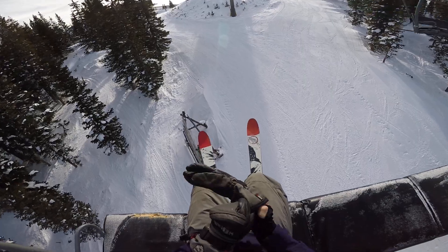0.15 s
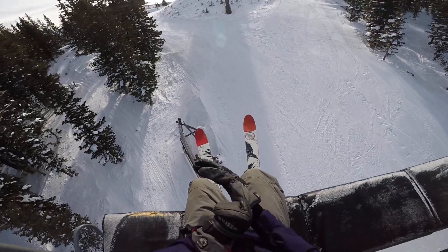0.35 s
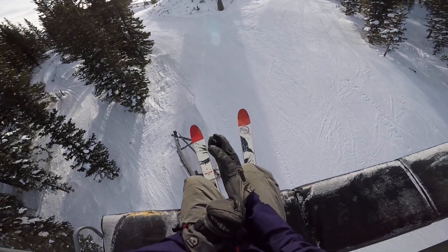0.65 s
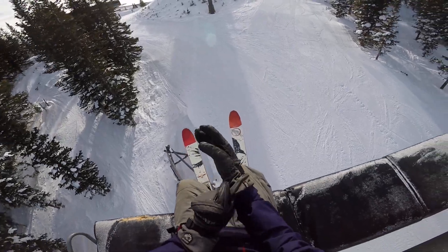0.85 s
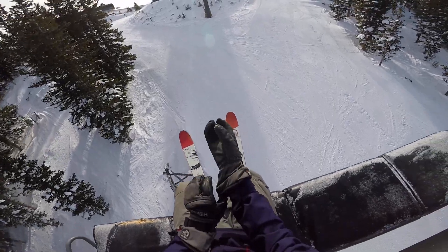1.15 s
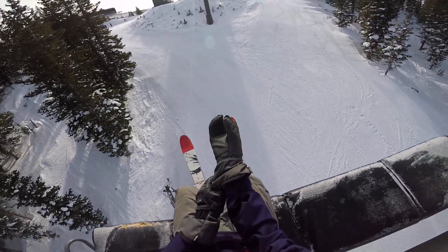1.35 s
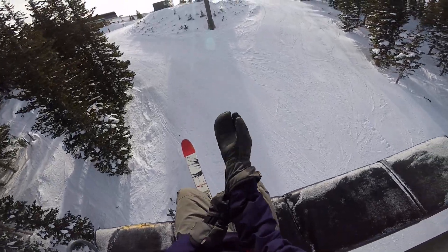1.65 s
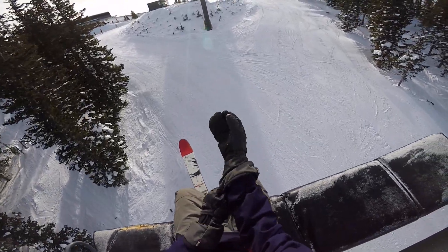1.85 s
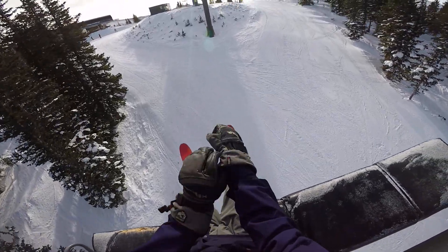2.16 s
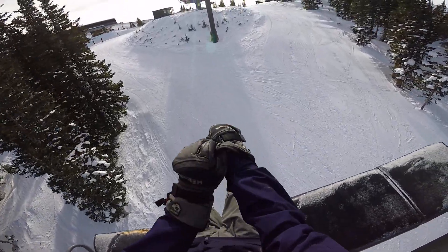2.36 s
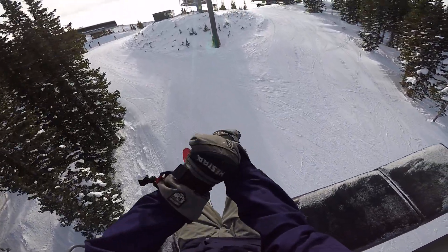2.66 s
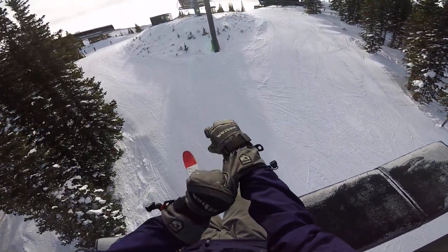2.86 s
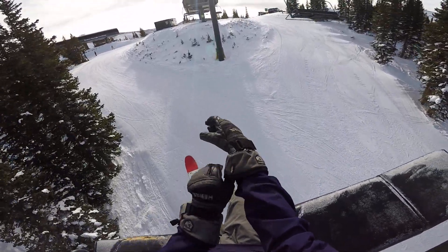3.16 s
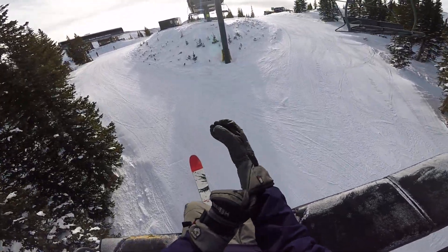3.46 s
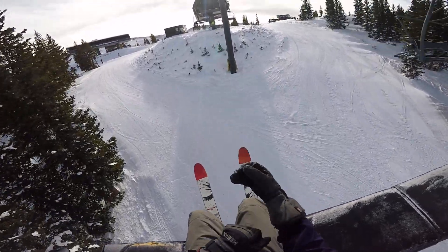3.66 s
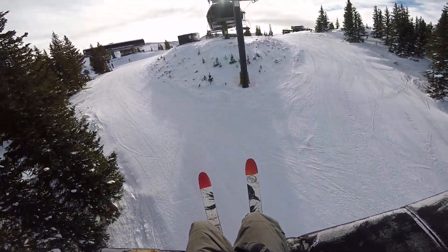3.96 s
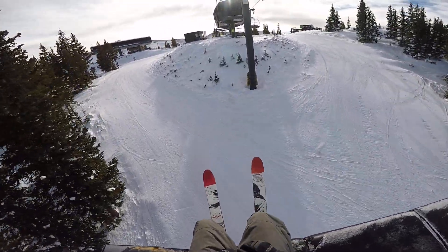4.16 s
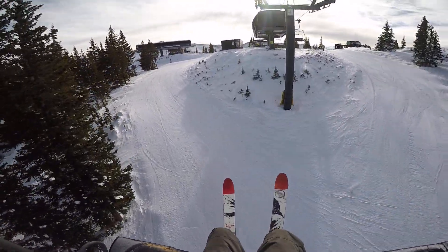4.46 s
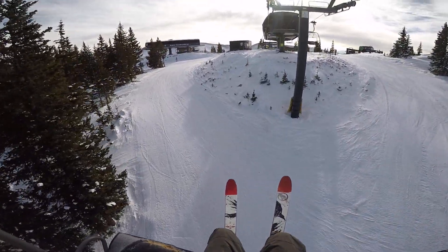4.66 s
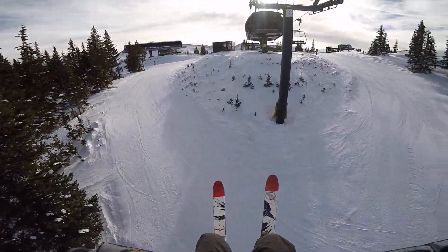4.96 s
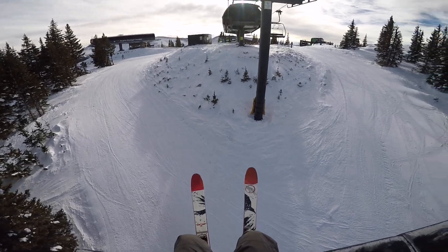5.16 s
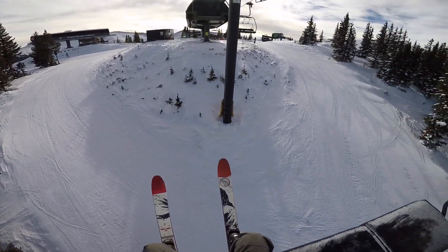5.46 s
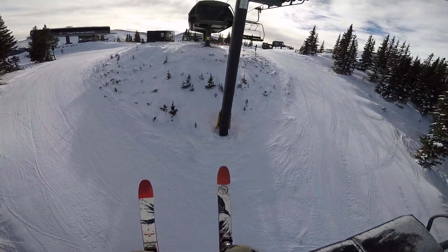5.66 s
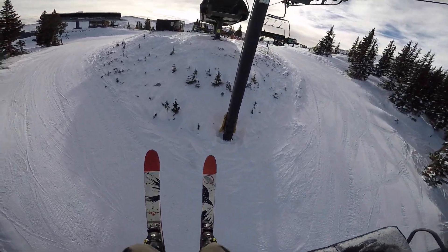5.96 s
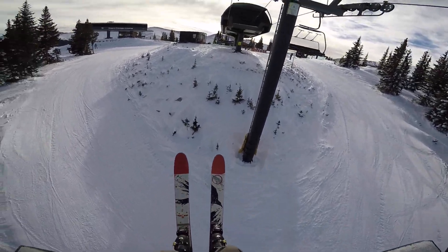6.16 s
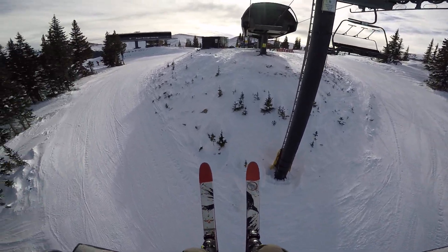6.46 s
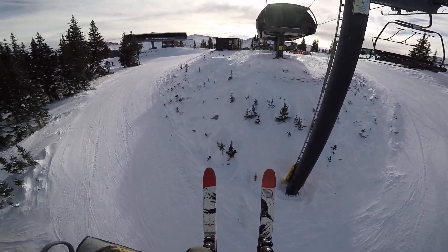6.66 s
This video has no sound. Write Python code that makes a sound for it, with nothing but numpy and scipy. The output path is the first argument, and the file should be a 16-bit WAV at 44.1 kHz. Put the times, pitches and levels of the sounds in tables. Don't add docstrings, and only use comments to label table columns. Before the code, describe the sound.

Riding a ski lift: steady cable rumble and hiss grow louder, with metallic chatter, dull knocks and gusty wind thumping the microphone.

```python
import sys
import numpy as np
from scipy import signal
from scipy.io import wavfile
from scipy.ndimage import uniform_filter1d

SR = 44100
rng = np.random.default_rng(int(sys.argv[2]) if len(sys.argv) > 2 else 0)


def file_out(sig):
    cols = np.atleast_2d(sig).T
    lim = np.clip(cols, -1, 1)
    pcm = np.round(lim * 32767).astype(np.int16)
    wavfile.write(sys.argv[1], SR, pcm)


def ratio(d):
    e = np.asarray(d, float) / 20
    return 10 ** e


N = 300762
T = np.arange(N) / SR
STRAND_HZ = 80
RUMBLE_DB, RUMBLE_SHARE = -26.5, 0.4


def evened(x):
    return x / np.sqrt(np.mean(x ** 2) + 1e-20)


def read(points, hz):
    f, value = np.transpose(points)
    return np.interp(np.log(hz + 1), np.log(f + 1), value)[:, None]


def curve(rows, col, t=T):
    rows = np.array(rows)
    return np.interp(t, rows[:, 0], rows[:, col])


def slow(rate_hz):
    return evened(signal.lfilter(*signal.butter(2, rate_hz, fs=SR), rng.standard_normal(N)))


def ringing(modes):
    out = rng.standard_normal((2, N))
    for hz, width, db in modes:
        r = np.exp(-np.pi * width / SR)
        pole = r * np.exp(2j * np.pi * hz / SR)
        ring = signal.lfilter([1 - r], [1, -pole], rng.standard_normal((2, N)))
        out = out + ratio(db + 18.5) * 2 * ring.real
    return out


# [t/s, share of the pair 0-1]
OPEN_SHARE = [(0, 0), (2.37, 0), (2.5, .3), (2.8, .55), (3.3, 1), (6.82, 1)]
# [f/Hz, likeness 0-1]
LIKENESS_ONE = [(11400, 1), (11900, 0.51), (13500, 0.33), (15000, 0.74)]
# [f/Hz, likeness 0-1]
LIKENESS_PAIR = [(60, 0.6), (160, 0.75), (270, 0.86), (440, 0.91), (730, 0.78), (1050, 0.56), (1500, 0.14),
                 (2100, 0.61), (3000, 0.61), (4300, 0.83), (5200, 0.51), (7300, 0.79), (8400, 0.062),
                 (10000, 0.083), (13000, .03)]
# [f/Hz, level/dB]
LEFT_LOUDER = [(60, -0.5), (270, 1.5), (440, 3), (730, 2.5), (1050, 5.5), (1500, 2.5), (2100, 0),
               (4300, 5.5), (5200, 4), (6300, 5.5), (7300, 2.5), (8400, -7), (13000, -2.5)]
# [f/Hz, phase/rad]
LEFT_AHEAD = [(60, 0), (1050, .38), (1500, -.9), (2800, -.24), (4300, .08), (6300, .65), (8400, 1.3),
              (13000, 1.3)]


def ports(pair, one, two, band, size, tilt=None, lean=None, same=None):
    overlap = size * 3 // 4
    hz, t, (a, b) = signal.stft(pair, SR, nperseg=size, noverlap=overlap)
    share = np.clip(curve(OPEN_SHARE, 1, t), 0, 1)
    power = (1 - share) * ratio(2 * read(one, hz)) + share * ratio(2 * read(two, hz))
    colour_db = 10 * np.log10(power)
    if tilt is not None:
        octaves = np.log2(np.maximum(hz[:, None] / band[1], 1))
        colour_db = colour_db + np.interp(t, T, tilt) * octaves
    inside = (hz > band[0]) & (hz < band[1])
    colour = ratio(colour_db) / np.sqrt(np.sum(ratio(2 * colour_db[inside]), 0) / len(hz))
    pair_like = read(LIKENESS_PAIR, hz) if same is None else same
    like = np.clip((1 - share) * read(LIKENESS_ONE, hz) + share * pair_like, -1, 1)
    lean_db = share * read(LEFT_LOUDER, hz) if lean is None else np.interp(t, T, lean)
    left = ratio(lean_db / 2)
    shared = like * np.exp(-1j * share * read(LEFT_AHEAD, hz)) / left
    own = np.sqrt(1 - like ** 2) / left
    middle = np.sqrt(abs(left + shared) ** 2 + own ** 2) / 2
    z = np.array([left * a, shared * a + own * b]) * colour / middle
    return signal.istft(z, SR, nperseg=size, noverlap=overlap)[1][:, :N]


# [t/s, level/dB]
GUST_LEVEL = [(0, -45), (0.12, -41), (0.6, -36), (1.7, -34.5), (2.1, -29), (2.45, -35), (3.12, -23.5),
              (3.48, -29), (4.02, -20.5), (4.2, -26.5), (4.38, -20.5), (4.56, -31.5), (4.92, -25),
              (5.25, -22.5), (5.64, -24), (5.82, -21), (6.0, -27.5), (6.4, -23.5), (6.82, -25.5)]
# [f/Hz, level/dB per Hz]
WIND_COLOUR = [(7.1, -21), (12, 7), (81, -3.5), (150, -20.5), (178, -13), (226, -16.5), (366, -19.5),
               (400, -17), (520, -23.5), (880, -120)]
# [t/s, level/dB]
WIND_LEAN = [(0, 0), (2.3, 0), (2.7, -6), (3.3, -12), (4.4, -12), (4.55, -3), (5.4, -4), (6.4, -5),
             (6.82, -2)]


def wind():
    gust_db = curve(GUST_LEVEL, 1)
    lumps = rng.standard_normal((2, N)) * ratio(gust_db + 0.94 * slow(9.8))
    tilt = -2 - 0.34 * (gust_db + 31)
    return ports(lumps, WIND_COLOUR, WIND_COLOUR, (15, 60), size=4096, tilt=tilt,
                 lean=curve(WIND_LEAN, 1), same=0.64)


# [t/s, nearness of the tower level/dB, load on the wheels level/dB]
RIDE_COURSE = [(0, -14, -12), (0.14, -22, -10), (0.25, -14.5, -8), (0.36, -13.5, -7), (0.6, -10.5, -7),
               (0.76, -14.5, -11), (0.88, -11, -7), (0.96, -11, 0.5), (1.2, -8, -1.5), (1.6, -8.5, 2.5),
               (2.55, -9, 1), (2.85, -10, -3), (3.35, -6, -1), (3.75, -4, -4.5), (4.4, -4, 1),
               (4.75, -3, -0.5), (5.2, -1, 0), (6.55, 1.5, -4), (6.82, 2.5, -0.5)]
# [f/Hz, level/dB per Hz]
RUMBLE_COLOUR = [(29, -23.5), (50, 1), (70, -2), (105, -2.5), (147, -5.5), (189, -6.5), (232, -9),
                 (291, -10.5), (366, -12.5), (401, -14), (770, -20.5), (1000, -74), (1690, -120)]
# [f/Hz, width/Hz, level/dB]
FRAME_MODES = [(84, 10, -21), (95.3, 2.9, -20.5), (143, 4, -11), (155.9, 4, -12), (182.6, 1.3, -18),
               (230.2, 6, -11), (592, 103, -19.5), (732, 3.7, -13.5)]
# [f/Hz, level/dB per Hz]
WHIRR_COLOUR = [(460, -26), (780, -3), (903, -2), (1010, -3), (1230, -12.5), (1700, -17), (2210, -46),
                (3740, -120)]
# [f/Hz, width/Hz, level/dB]
WHEEL_MODES = [(964, 38, -13), (1018, 43, -11), (1142.4, 17, -7.5), (1405, 21, -14.5), (1243, 8, -10.5),
               (1618, 13, -11)]
# [f/Hz, level/dB per Hz]
HISS_COLOUR_ONE = [(710, -24), (1200, -0.5), (1650, -4), (1770, -3), (1890, -5), (2060, -7), (2170, -5.5),
                   (3110, -12.5), (4090, -8.5), (5100, -12.5), (6300, -14), (7200, -21), (8200, -17),
                   (8930, -14), (12800, -28), (15000, -33)]
# [f/Hz, level/dB per Hz]
HISS_COLOUR_PAIR = [(710, -19), (1200, -1), (1500, -1.5), (2360, -3), (2800, -3.5), (3110, -5.5),
                    (3600, -3.5), (4790, -9.5), (5610, -6.5), (7310, -7), (8300, -11.5), (9000, -15.5),
                    (9600, -13), (10300, -16.5), (12700, -24), (14200, -29), (15000, -80)]
# [f/Hz, width/Hz, level/dB]
TOWER_MODES = [(1913, 61, -14.5), (2175, 48, -15), (2808, 59, -15), (6260, 50, -16), (6450, 34, -14),
               (7250, 79, -13)]


def rope():
    flicker = slow(8.5)
    near_db, load_db = curve(RIDE_COURSE, 1), curve(RIDE_COURSE, 2)
    rumble_db = RUMBLE_DB + RUMBLE_SHARE * near_db - 4.5 + 1.0 * flicker
    rumble = ringing(FRAME_MODES) * ratio(rumble_db)
    whirr_db = -40.5 + 0.47 * near_db + load_db - 5.0 + 0.82 * flicker
    whirr = ringing(WHEEL_MODES) * ratio(whirr_db)
    throb_db = 1.2 * np.cos(2 * np.pi * STRAND_HZ * T)
    hiss_db = -40.5 + near_db - 3.0 + 0.84 * flicker + throb_db + 0.75 * slow(60)
    hiss = ringing(TOWER_MODES) * ratio(hiss_db)
    return (ports(rumble, RUMBLE_COLOUR, RUMBLE_COLOUR, (90, 700), size=2048)
            + ports(whirr, WHIRR_COLOUR, WHIRR_COLOUR, (800, 1400), size=1024)
            + ports(hiss, HISS_COLOUR_ONE, HISS_COLOUR_PAIR, (1600, 11000), size=512))


# [t/s, level/dB]
STRAND_LEVEL = [(0, -61), (0.9, -45), (2.0, -35), (2.2, -51), (2.4, -29.5), (3.0, -34), (3.4, -29),
                (3.6, -33.5), (3.9, -28), (4.2, -34), (4.6, -26.5), (5.0, -22.5), (5.2, -39), (5.4, -28),
                (5.75, -26.5), (6.0, -17), (6.3, -30), (6.82, -27.5)]
DRIVE_PITCHES = [142.7, 156, 226.8, 232.4, 259, 363.7, 433.1, 516]
# [level/dB against the rumble, single-port change/dB, change under the tower/dB and /Hz]
DRIVE_LEVELS = [(-16, 2.5, -2, 0), (-14.5, -5, 2.5, 0), (-15, 1.5, -4.5, 0), (-18.5, 1.5, 1, 0),
                (-23, 2, -1, 0), (-16, -4, 1, 0), (-21, 0, -2, 0), (-24, 1.5, 3.5, 3)]


def tones():
    share = curve(OPEN_SHARE, 1)
    apart = np.array([[1], [-1]]) * share
    turns = np.cumsum(STRAND_HZ + 1.3 * slow(3.4)) / SR
    strand_amp = ratio(curve(STRAND_LEVEL, 1) + 1.5 + 0.85 * slow(5.8))
    out = strand_amp * np.sin(2 * np.pi * turns + 0.15 * apart * slow(3.5))
    rumble_db = uniform_filter1d(RUMBLE_DB + RUMBLE_SHARE * curve(RIDE_COURSE, 1), SR // 2)
    under = np.clip((T - 3.6) / (5.2 - 3.6), 0, 1)
    for hz, (db, one_db, under_db, shift_hz) in zip(DRIVE_PITCHES, DRIVE_LEVELS):
        turns = np.cumsum(hz + shift_hz * under + 0.3 * slow(1.5)) / SR
        waver_db = 1.2 * slow(3.5)
        tone_db = rumble_db + db + 5.5 + one_db * (1 - share) + under_db * under + waver_db
        out = out + ratio(tone_db) * np.sin(2 * np.pi * turns + 0.16 * apart * slow(3.3))
    return out


# [t/s, peak level/dB, time to fade by 60 dB/s]
KNOCK_EVENTS = [(0.164, -39, .05), (0.62, -33, 0.15), (0.67, -33, .05), (0.984, -37, .06),
                (1.037, -32, 0.058), (1.269, -36, 0.06), (1.832, -37, 0.16), (2.473, -28.5, 0.13),
                (3.286, -26, 0.12), (3.706, -27, 0.13), (3.829, -32.5, 0.72), (4.579, -27.5, 0.33),
                (4.72, -25, 0.062), (4.989, -29.5, 0.32), (5.074, -23, 0.063), (5.186, -28, 0.47),
                (5.39, -25.5, 0.3), (5.799, -28, 0.21), (5.959, -25, 0.12), (6.339, -26, 0.45),
                (6.45, -25.5, 0.37), (6.497, -18.5, 0.068), (6.54, -23.5, 0.13), (6.574, -22.5, 0.28),
                (6.754, -24, 0.14)]
# [f/Hz, level/dB per Hz]
KNOCK_COLOUR = [(400, -36), (800, 13), (1050, 8.5), (1500, -1), (2200, -0.5), (2900, -4.5), (4200, -1.5),
                (6500, -19.5)]


def knocks():
    power = np.zeros(N)
    for s, db, t60 in KNOCK_EVENTS:
        start = round(s * SR)
        after = T[:min(SR // 2, N - start)]
        fade = ratio(2 * db - 120 * after / max(t60, .03))
        power[start:start + len(after)] += fade * (1 - np.exp(-after / 0.01))
    dull = ratio(-11.5) * np.sqrt(power) * ringing(WHEEL_MODES + TOWER_MODES)
    return ports(dull, KNOCK_COLOUR, KNOCK_COLOUR, (800, 3000), size=512)


# [t/s, spread/s, f/Hz, peak level/dB]
GROAN_EVENTS = [(2.165, 0.053, 410, -34.5), (7.8, 0.026, 1025, -34.5), (6.375, 0.024, 935, -35),
                (6.43, .06, 1030, -36), (6.78, 0.074, 480, -33.5), (6.2, 0.043, 1030, -39),
                (5, 0.096, 156, -30), (4.95, 0.059, 105, -29.5), (5.08, 0.072, 143, -26.5),
                (5.51, 0.083, 120, -24), (6.9, 0.083, 154, -26), (6.62, .07, 82, -26.5),
                (6.63, 0.078, 200, -33), (6.62, 0.09, 235, -33), (5.0, 0.042, 170, -32.5),
                (2.95, .1, 146, -33), (1.0, 0.052, 86, -28.5), (0.59, 0.075, 180, -33),
                (2.2, 0.031, 310, -39), (4.2, .04, 330, -36)]


def groans():
    shake = 0.93 * slow(28)
    out = np.zeros(N)
    for s, spread, hz, db in GROAN_EVENTS:
        swell = np.exp(-((T - s) / spread) ** 2 / 2)
        phase = 2 * np.pi * hz * T + min(hz / 900, 1) * shake
        out = out + ratio(db) * swell * np.sin(phase)
    return out


def train(events):
    s, db = np.transpose(events)
    return np.bincount(np.round(s * SR).astype(int), ratio(2 * db), N)[:N]


# [t/s, length/s, peak level/dB, every second
# strand level/dB]
CHATTER_BURSTS = [(0.605, 0.045, -50, 0), (1.002, 0.047, -57, -13), (1.182, 0.02, -40.5, -2),
                  (1.266, 0.13, -43.5, 2), (1.464, 0.06, -54, -10), (1.578, 0.12, -41, -2),
                  (1.817, 0.082, -44, -8), (2.071, 0.21, -43, -2), (2.27, 0.15, -45, -7),
                  (2.449, 0.17, -42, -14), (2.656, 0.056, -36, -3), (2.771, 0.1, -43.5, 4.5),
                  (2.89, 0.041, -36.5, -0.5), (2.972, 0.022, -39.5, -8), (3.072, 0.022, -38, 2),
                  (3.247, 0.13, -41.5, 3), (3.415, 0.033, -34, -3), (3.59, 0.043, -35, 1.5),
                  (3.708, 0.0066, -32.5, 0), (3.823, 0.033, -34, 0.5), (3.984, 0.094, -39, 7),
                  (4.211, 0.016, -37, -1), (4.28, 0.016, -29.5, -18), (4.322, 0.028, -40.5, 9.5),
                  (4.390, 0.085, -35.5, -22),
                  (4.491, .013, -30.5, 1.5), (4.563, 0.068, -31.5, -4), (4.695, 0.027, -34, 8),
                (4.83, 0.05, -30.5, -2), (4.922, 0, -29.5, 13), (4.986, 0.0099, -28.5, 0),
                (5.073, 0.046, -30, -3), (5.159, 0.099, -30, 1), (5.264, 0.0053, -27, 2),
                (5.307, 0.023, -35, -2), (5.375, 0.071, -28.5, -2), (5.553, 0, -32, 0),
                (5.616, 0.11, -28.5, -1), (5.8, 0.013, -26.5, -23), (5.953, 0.065, -30.5, 1),
                (6.132, 0.046, -30.5, -2), (6.214, 0.0028, -26, 2), (6.298, 0, -33, 0),
                (6.326, 0.045, -29.5, -0.5), (6.45, 0.082, -27.5, -3), (6.53, 0.063, -27, -3),
                (6.666, 0.0015, -28, 0), (6.718, 0.00093, -28.5, 3), (6.755, 0, -27, 1.5),
                (6.805, 0, -31, -3.5)]
# [t/s, peak level/dB]
LONE_TICKS = [(0.63, -41), (0.642, -44), (0.9831, -45), (1.0091, -50), (1.0355, -35), (1.1872, -40),
              (1.265, -47), (1.2879, -47), (1.3154, -42), (1.3418, -35), (1.465, -38), (1.502, -36),
              (1.5394, -46), (1.5653, -48), (1.5813, -42), (1.6037, -45), (1.6262, -50), (1.6421, -37),
              (1.6811, -38), (1.7354, -36), (1.8292, -39), (1.8686, -35), (1.914, -37), (2.0058, -39),
              (2.0707, -40), (2.1335, -50), (2.1714, -33.5), (2.2228, -42), (2.2727, -42), (2.2967, -45),
              (2.3351, -40), (2.4558, -40), (2.778, -38), (3.066, -36), (3.1, -36), (3.19, -36),
              (4.279, -30), (4.305, -32), (4.342, -34), (4.757, -28.5), (6.441, -22.5), (6.467, -22),
              (6.49, -23), (6.503, -21), (6.526, -23), (6.572, -28), (6.6, -29), (6.612, -28)]


def ticks():
    start, length, db, offbeat_db = np.transpose(CHATTER_BURSTS)[:, :, None]
    strand = np.arange(16)
    chance = rng.standard_normal((len(start), len(strand), 2)).transpose(2, 0, 1)
    late, luck = chance * (strand > 0)
    s = start + strand / STRAND_HZ + 0.0018 * late
    inside = np.clip((length - strand / STRAND_HZ) * STRAND_HZ + 1, 0, 1)
    tick_db = db + offbeat_db * (strand % 2) - 0.11 * strand + 2 * luck
    strong = inside * ratio(2 * tick_db)
    bursts = np.bincount(np.round(s * SR).astype(int).ravel(), strong.ravel(), N)[:N]
    return ratio(2 * -2.5) * train(LONE_TICKS) + bursts


# [f/Hz, level/dB per Hz]
TICK_COLOUR_ONE = [(1470, 11.5), (2500, -9), (3110, -2), (4070, 10), (4760, 3.5), (5960, 6), (6430, 2),
                   (6770, -5), (7300, -5), (7690, -4), (8940, -11.5), (12500, -10.5), (15000, -30)]
# [f/Hz, level/dB per Hz]
TICK_COLOUR_PAIR = [(1470, -40), (2500, -3), (2840, -0.5), (3110, -8.5), (3480, 0), (4390, -8),
                    (5620, -1.5), (7300, -0.5), (8290, -8), (9780, -12), (13300, -37), (14100, -24),
                    (15000, -49)]


def rattle():
    t = np.arange(6000) / SR
    tail = ratio(-120 * t / 0.049) + 0.079 * ratio(-120 * t / 0.073)
    tick = (1 - np.exp(-t / 0.002)) * tail
    power = abs(signal.oaconvolve(ticks(), tick)[:N])
    bright = ratio(-6.0) * np.sqrt(power) * ringing(TOWER_MODES)
    return ports(bright, TICK_COLOUR_ONE, TICK_COLOUR_PAIR, (3500, 9000), size=256)


# [t/s, peak level/dB]
CLIP_TAPS = [(2.4742, -43), (2.5401, -50), (2.5914, -50), (2.6408, -52), (2.6568, -38), (2.7216, -46),
             (2.7895, -48), (2.8164, -44), (2.8434, -44), (2.8803, -43), (2.8943, -36.5), (2.9197, -39),
             (2.9431, -44), (2.9706, -41), (2.995, -42), (3.0718, -42), (3.0843, -37), (3.1482, -44),
             (3.2385, -43), (3.2624, -39), (3.2844, -40), (3.3038, -40), (3.3876, -41), (3.4141, -40),
             (3.426, -39), (3.438, -35), (3.464, -33.5), (3.5004, -45), (3.5268, -46), (3.5408, -38),
             (3.5762, -39), (3.5947, -38), (3.6186, -33), (3.6431, -37), (3.667, -40), (3.7074, -29),
             (3.7428, -37), (3.7708, -37), (3.8366, -43), (3.9214, -38), (3.9474, -36), (3.9708, -41),
             (3.9977, -40), (4.0227, -38), (4.0372, -42), (4.0591, -32), (4.0975, -50), (4.1215, -37),
             (4.1858, -48), (4.2103, -40), (4.2382, -39), (4.2801, -38), (4.339, -37), (4.3674, -49),
             (4.3923, -44), (4.4128, -42), (4.4338, -41), (4.4647, -45),
             (4.4897, -37), (4.5047, -33), (4.5561, -39), (4.5646, -38), (4.583, -31), (4.607, -28),
             (4.6303, -25), (4.6963, -33), (4.7092, -32), (4.723, -25.5), (4.8075, -37), (4.834, -31.5),
             (4.8804, -32.5), (4.9073, -38), (4.9233, -31), (4.9746, -36), (4.9901, -34), (5.0754, -27),
             (5.097, -26.5), (5.1253, -30), (5.1597, -29), (5.1981, -33), (5.234, -28), (5.2675, -36),
             (5.277, -33), (5.3014, -31), (5.338, -29.5), (5.3782, -39), (5.3902, -28), (5.4053, -27),
             (5.4261, -37), (5.465, -29.5), (5.5279, -32), (5.5528, -31), (5.6152, -37), (5.6426, -34),
             (5.6666, -30), (5.6915, -37), (5.7035, -25.5), (5.7978, -30), (5.8217, -29), (5.8666, -33),
             (5.958, -28), (5.9958, -33), (6.0267, -28.5), (6.0706, -32), (6.1345, -32), (6.1759, -33),
             (6.2133, -33), (6.2971, -29), (6.3316, -33), (6.336, -27), (6.4423, -30), (6.4687, -30),
             (6.4932, -25), (6.5255, -25), (6.5725, -31), (6.6683, -30), (6.7192, -33), (6.7581, -28)]
# [f/Hz, level/dB per Hz]
PING_COLOUR = [(4800, -31), (5700, -5), (6500, -15), (6900, -3), (7300, -2), (7800, -4), (8200, -28),
               (9600, -26), (10500, -47)]


def pings():
    rise_s, t60_s = 0.0017, 0.031
    t = np.arange(4000) / SR
    shape = (1 - np.exp(-t / rise_s)) * ratio(-120 * t / t60_s)
    power = abs(signal.oaconvolve(train(CLIP_TAPS), shape)[:N])
    puffs = ratio(-2.5) * np.sqrt(power) * rng.standard_normal((2, N))
    return ports(puffs, PING_COLOUR, PING_COLOUR, (6500, 7900), size=256)


# [t/s, spread/s, peak level/dB]
SLAP_EVENTS = [
    (5.04, 0.036, -25),
    (5.5, 0.13, -26),
    (5.748, 0.036, -24.5),
    (6.1, 0.11, -30.5),
    (6.65, 0.09, -34),
]
# [f/Hz, level/dB per Hz]
SLAP_COLOUR = [(40, -5.5), (110, 1.5), (300, -14), (520, -22), (900, -55.5)]


def buffets():
    power = sum(ratio(2 * db) * np.exp(-((T - s) / spread) ** 2) for s, spread, db in SLAP_EVENTS)
    slaps = rng.standard_normal((2, N)) * np.sqrt(power) * ratio(2.8 * slow(27) - 4.0)
    return ports(slaps, SLAP_COLOUR, SLAP_COLOUR, (60, 500), size=1024, lean=0 * T, same=-.7)


def scene():
    return wind() + rope() + tones() + knocks() + groans() + rattle() + pings() + buffets()


# [f/Hz, step level/dB against its band]
LOSS_STEPS = [
    [(7000, -14), (9500, -4), (10800, 6), (12500, 7), (14000, 8), (14600, 16)],
    [(2000, -14), (2900, 8), (4400, 8), (5200, -6), (9500, -2), (10500, 7), (14000, 8), (14600, 16)],
]
# [t/s, f/Hz]
TREBLE_LIMIT = [(0, 4300), (.1, 4330), (.2, 5000), (.27, 6500), (.36, 8500), (.55, 10500), (.8, 11800),
                (1.05, 15300), (6.82, 15300)]
# [t/s, f/Hz]
TOP_LIMIT = [(0, 12000), (.35, 12600), (.6, 13500), (.8, 13200), (.9, 15300), (6.82, 15300)]


def starve(x):
    lead = 1024 - 303
    both = np.pad([x[0] + x[1], x[0] - x[1]], ((0, 0), (lead, 0))) / 2
    hz, t, z = signal.stft(both, SR, "cosine", nperseg=2048, noverlap=1024)
    t = t - lead / SR
    band = np.arange(len(hz)) // 16
    power = uniform_filter1d(abs(z) ** 2, size=33, axis=1)
    level = np.sqrt(abs(uniform_filter1d(power, size=4, axis=2))) + 1e-12
    luck = rng.standard_normal((2, band[-1] + 1, len(t)))
    luck = evened(uniform_filter1d(luck, size=3, axis=2))[:, band]
    closed = np.clip(curve(OPEN_SHARE, 1, t), 0, 1) - 1
    short_db = 20 * closed * np.reshape([1, .4], (2, 1, 1))
    step_db = np.array([read(table, hz) for table in LOSS_STEPS]) + short_db + 2.5 * luck
    step = level * ratio(step_db)
    z = step * np.floor(abs(z) / step + .35) * np.exp(1j * np.angle(z))
    for limit, slope_db in ((TREBLE_LIMIT, -13.0), (TOP_LIMIT, -90.0)):
        z = z * ratio(slope_db * np.log2(np.maximum(hz[:, None] / curve(limit, 1, t), 1)))
    both = signal.istft(z, SR, "cosine", nperseg=2048, noverlap=1024)[1]
    middle, side = both[:, lead:lead + N]
    return np.array([middle + side, middle - side])


def low_pass(x):
    return signal.sosfilt(signal.butter(12, 15140, fs=SR, output="sos"), x)


def record(dry):
    start_s, start_gain, fade_s = 0.0037, 0.079, 0.11
    rise = np.clip(T / fade_s, 0, 1) ** 1.7
    fade = (T > start_s) * (start_gain + (1 - start_gain) * rise)
    mix = starve(dry * fade)
    return low_pass(mix)


dry = scene()
out = record(dry)
file_out(out)
```